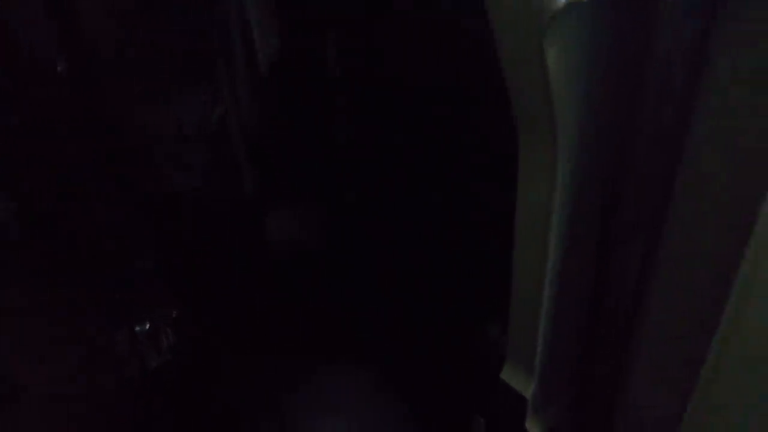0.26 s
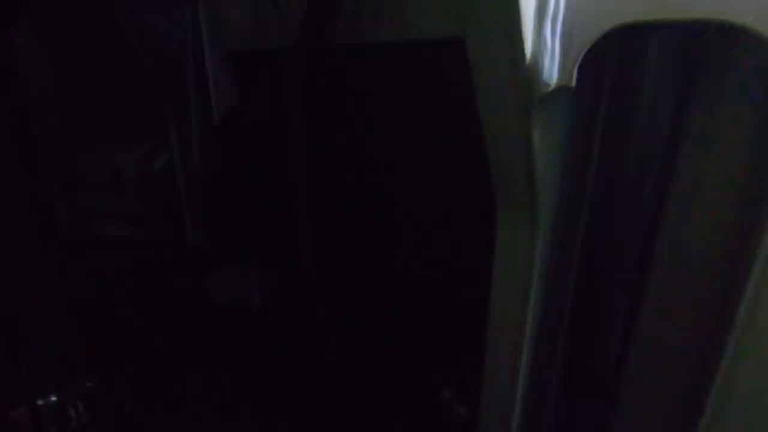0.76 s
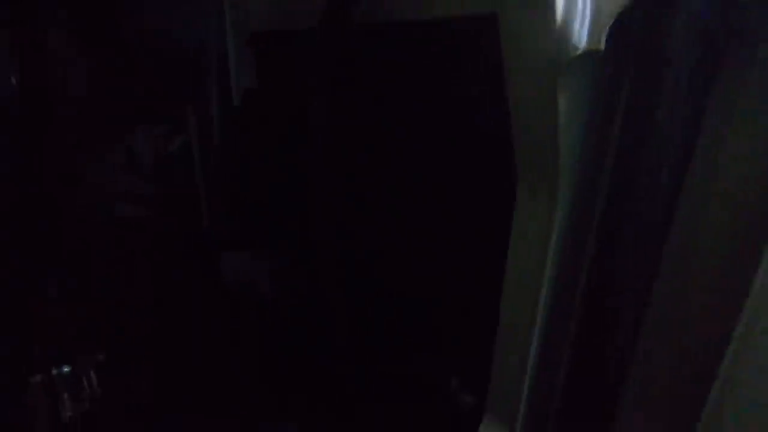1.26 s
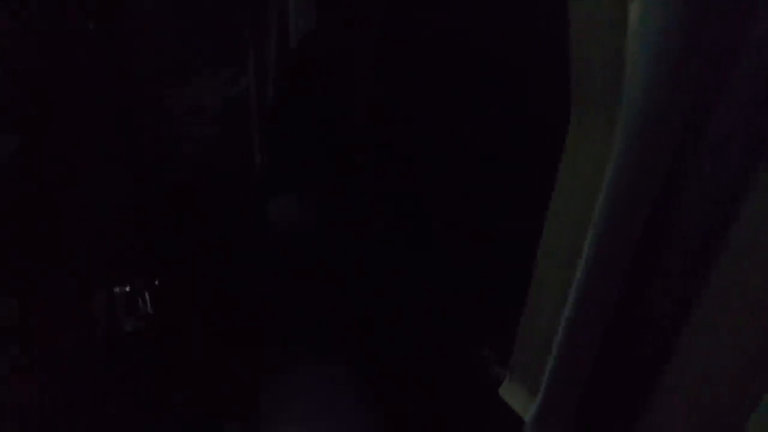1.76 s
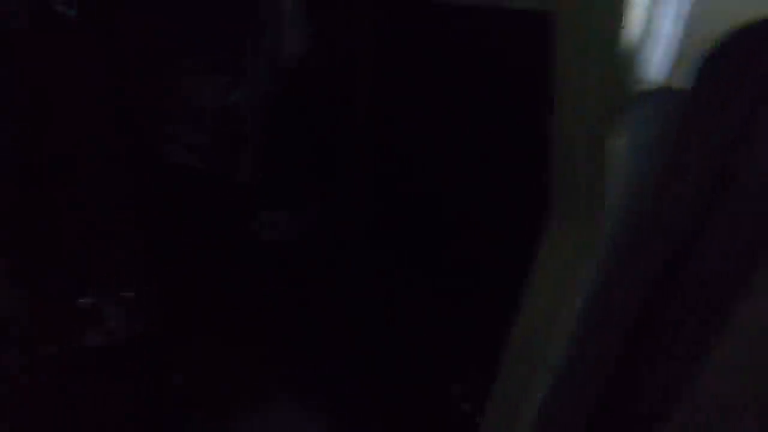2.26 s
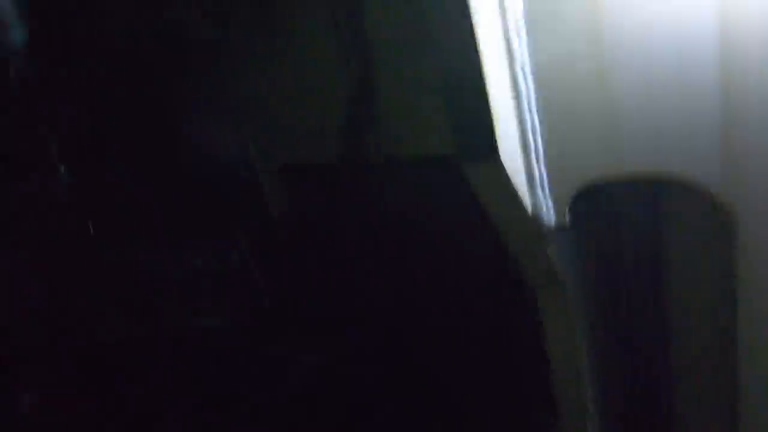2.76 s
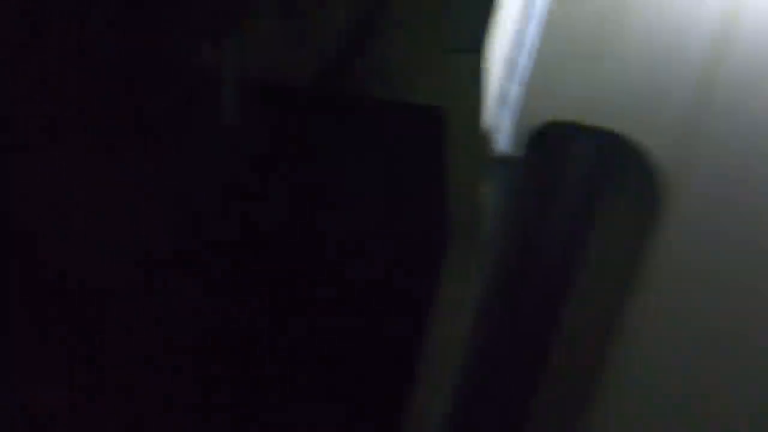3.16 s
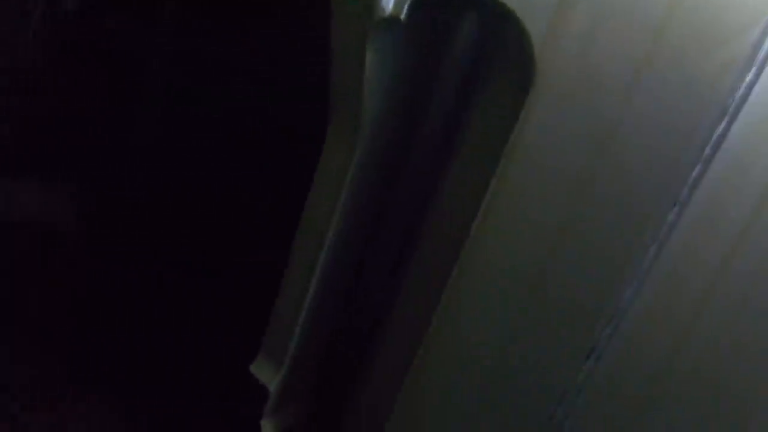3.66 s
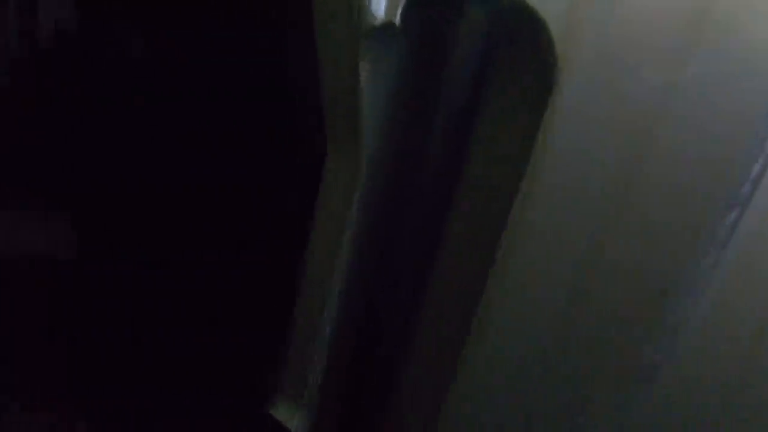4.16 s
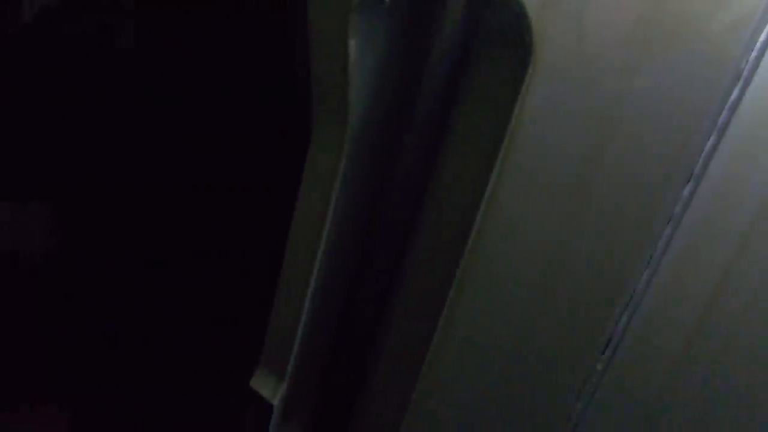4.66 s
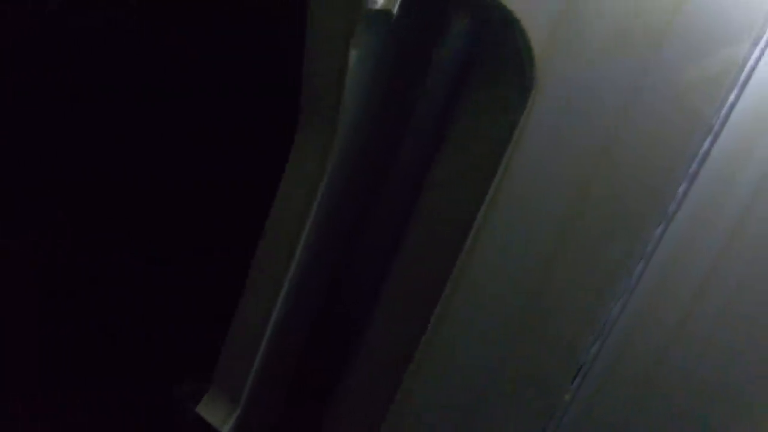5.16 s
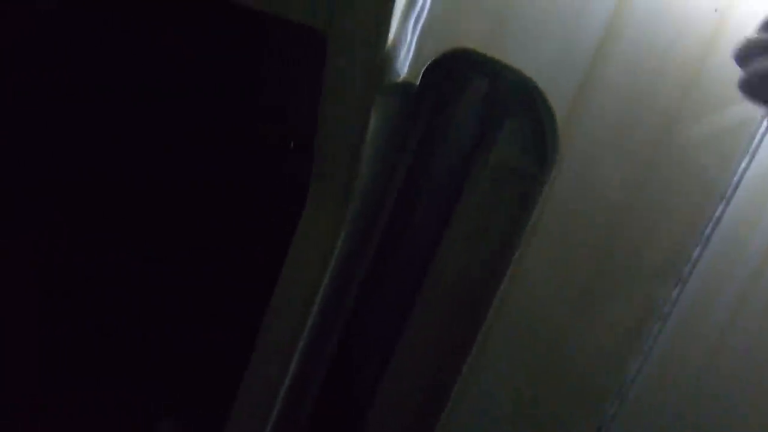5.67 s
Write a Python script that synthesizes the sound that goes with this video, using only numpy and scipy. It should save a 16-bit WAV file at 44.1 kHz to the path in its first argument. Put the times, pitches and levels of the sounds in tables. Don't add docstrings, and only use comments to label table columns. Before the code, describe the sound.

Inside a steel-walled engine room, a big diesel holds a constant deep hum near 90 hertz, dominating everything. Soft fan and pump tones and a dark airy roar lie beneath it. A thin whine swells faintly around one second, a dull knock lands at two, and the tone colour shifts slightly as the handheld microphone turns away.

```python
import sys
import numpy as np
from scipy import signal
from scipy.fft import rfft, irfft, next_fast_len
from scipy.io import wavfile
from scipy.ndimage import uniform_filter1d, minimum_filter1d

SR = 44100
rng = np.random.default_rng(int(sys.argv[2]) if len(sys.argv) > 2 else 0)


def transcribe(signal):
    frames = np.atleast_2d(signal).T
    limited = np.clip(frames, -1, 1)
    pcm = np.round(limited * 32767).astype(np.int16)
    wavfile.write(sys.argv[1], SR, pcm)


def voltage_ratio(level):
    return 10 ** (np.asarray(level, float) / 20)


N = 261071

# multiple of the four-stroke cycle [1], rms level/dB
ENGINE_ORDERS = [(6, -54.1), (8, -55.1), (9, -49.0), (12, -23.8), (13, -55.0), (14, -56.5), (15, -46.2),
                 (18, -48.8), (19, -54.8), (21, -45.3), (22, -54.1), (27, -48.9), (33, -58.8), (34, -55.6),
                 (35, -58.1), (36, -51.6), (39, -59.5), (42, -57.1), (43, -57.7), (44, -60.5), (47, -60.0),
                 (48, -58.1), (54, -59.4), (58, -63.1), (59, -65.1), (60, -63.1), (63, -64.6), (66, -61.9),
                 (70, -65.0), (72, -66.5)]
# f/Hz, rms level/dB
AUXILIARY_TONES = [(70.78, -55.1), (94.09, -53.8), (139.99, -53.7), (148.06, -54.9), (176.14, -52.9),
                   (178.51, -52.3), (316.22, -53.0), (353.34, -57.6), (478.42, -55.0), (592.9, -61.7),
                   (632.22, -61.6), (713.9, -66.4), (948.6, -68.6), (988, -70), (1170, -72), (2213, -79)]
# f/Hz, level/dB
ROAR_SPECTRUM = [(25, -7.5), (45, -6.5), (70, 3), (120, 3), (180, 5), (290, -7), (380, -3.5), (500, -12.5),
                 (700, -12.5), (1300, -20.5), (2500, -31), (4500, -40), (6000, -38), (7000, -49)]
# f/Hz, level/dB
TREBLE_LOSS = [(7000, 0), (8200, -10), (10400, -25), (10900, -30), (11500, -29), (12300, -24), (14500, -30),
               (15700, -33)]
# t/s, rms level/dB
HUM_LEVEL = [
    (0, -23.3),
    (1.3, -22.7),
    (3.2, -23.1),
    (5.92, -23.5),
]
# t/s, turn [0-1]
LISTENER_TURN = [
    (0, .1),
    (.8, 0),
    (2.0, .45),
    (3.5, 0.8),
    (4.0, 0.9),
    (5.92, 0.85),
]
# t/s, level/dB
STANDING_WAVE = [
    (0, -3),
    (.5, 3),
    (1.0, 1),
    (1.8, -4.5),
    (2.05, 4),
    (2.55, -0.5),
    (3.15, -11),
    (4.0, 1.5),
    (5.3, 1),
    (5.92, -5.5),
]
# t/s, length/s, rise level/dB
GEAR_LOADS = [
    (.25, .3, 6),
    (1.098, 0.99, 11.5),
    (3.702, .4, 6),
    (4.6, .4, 4.5),
    (5.503, 0.64, 9),
]
# t/s, peak level/dB
DECK_KNOCKS = [
    (2.006, -29.5),
    (2.531, -38),
    (4.042, -37),
]
# t/s, length/s, level/dB
FINGER_RUSTLES = [
    (2.58, .14, -96),
    (4.0, .05, -101),
    (4.2, .08, -99),
    (4.345, .004, -90.5),
]

CYCLE_HZ, CRANK_START_RAD = 7.4895, 1.513
THROB_STEADINESS = 0.65
BLOWER_HZ, BLOWER_START_RAD = 59.08, 1.1
SHADOW_POWER = 4.7
LOWER_MESH_HZ, UPPER_MESH_HZ = 1667.3, 1711.5
UPPER_ORDER_DB, WHINE_DB = -43, -69
RUMBLE_DB, RUMBLE_FOLLOWS = -39.5, 0.38


def in_time(rows):
    at_s, value = np.transpose(rows)
    return np.interp(np.arange(N) / SR, at_s, value)


def rms_one(x):
    return x / np.sqrt(np.mean(x ** 2) + 1e-20)


def colour(x, points):
    hz, level_db = np.transpose(points)
    size = next_fast_len(N + N % 2, real=True)
    grid_hz = np.maximum(np.arange(size // 2 + 1) * SR / size, 1)
    gain = voltage_ratio(np.interp(np.log(grid_hz), np.log(hz), level_db))
    return irfft(rfft(np.resize(x, size)) * gain, size)[:N]


def drift(rate_hz):
    pole = np.exp(-200 * np.pi * rate_hz / SR)
    noise = rng.standard_normal(N // 100 + 2002)
    slow = signal.lfilter([1], [1, -2 * pole, pole * pole], noise)[2000:]
    return np.interp(np.arange(N) / 100, np.arange(len(slow)), rms_one(slow - slow.mean()))


def tone(angle_rad, level_db):
    return -np.sqrt(2) * voltage_ratio(level_db) * np.cos(angle_rad)


def engine(followed_db, sway_db, throb_db):
    crank_rad = CRANK_START_RAD + 2 * np.pi * CYCLE_HZ * np.arange(N) / SR
    out = np.zeros(N)
    for order, level_db in ENGINE_ORDERS:
        order = round(order)
        in_step = order in (6, 9, 12, 15)
        offset_rad = rng.uniform(0, 2 * np.pi) * (not in_step)
        sway = sway_db * (1 - THROB_STEADINESS * in_step) * drift(0.8)
        swaying_db = level_db + throb_db * in_step + sway
        out += tone(order * crank_rad + offset_rad, followed_db.get(order, swaying_db))
    return out


def auxiliaries(blower_db, sway_db, slip):
    s = np.arange(N) / SR
    blower_rad = 2 * np.pi * BLOWER_HZ * s + BLOWER_START_RAD + 0.37 * drift(1.0)
    out = tone(blower_rad, blower_db)
    for hz, level_db in AUXILIARY_TONES:
        wander_rad = rng.uniform(0, 2 * np.pi) + slip * np.sqrt(hz) * drift(0.6)
        out += tone(2 * np.pi * hz * s + wander_rad, level_db + sway_db * drift(1.7))
    return out


def standing_waves(air, depth_db, spacing_hz, count):
    hz = np.arange(spacing_hz, 12000, spacing_hz)
    place = np.linspace(0, count - 1, N)
    out = np.zeros(N)
    for k, ripple in enumerate(rng.standard_normal((count, 1000))):
        share = np.clip(1 - np.abs(place - k), 0, 1)
        ripple_db = depth_db * np.resize(ripple, len(hz))
        out += share * colour(air, np.transpose([hz, ripple_db]))
    return out


def ventilation(rumble_db, roar_db, hiss_db, patchy_db):
    air = standing_waves(rng.standard_normal(N), depth_db=1.48, spacing_hz=15.0, count=5)
    air = colour(colour(air, TREBLE_LOSS), ROAR_SPECTRUM)
    low = signal.sosfiltfilt(signal.butter(2, 280, fs=SR, output="sos"), air)
    high = signal.sosfiltfilt(signal.butter(2, 1800, "high", fs=SR, output="sos"), air)
    middle = air - low - high
    rumble = voltage_ratio(rumble_db + patchy_db * drift(2.9)) * rms_one(low)
    roar = voltage_ratio(roar_db + patchy_db * drift(3.3)) * rms_one(middle)
    hiss = voltage_ratio(hiss_db + 2.5 + 0.13 * drift(2.1)) * rms_one(high)
    return rumble + roar + hiss


def bell(at_s, length_s):
    return np.exp(-(2 * (np.arange(N) / SR - at_s) / length_s) ** 2)


def gear_load():
    return WHINE_DB + sum(rise_db * bell(at_s, length_s) for at_s, length_s, rise_db in GEAR_LOADS)


def gears(whine_db):
    s = np.arange(N) / SR
    out = np.zeros(N)
    for mesh_hz, under_db in ((LOWER_MESH_HZ, 3.5), (UPPER_MESH_HZ, 8)):
        slip_rad = 1.6 * drift(2.5)
        level_db = np.minimum(whine_db, -61) - under_db + 2.5 * drift(3.5)
        out += tone(2 * np.pi * mesh_hz * s + slip_rad, level_db)
    return out


def knocks(plate_hz, t60_s, push_s, push_db):
    out = np.zeros(N)
    s = np.arange(SR // 2) / SR
    rise = 1 - np.exp(-(s / 0.0029) ** 2)
    push = np.sin(np.pi * np.minimum(s / push_s, 1)) ** 2
    ring = rise * voltage_ratio(-60 * s / t60_s) * np.sin(2 * np.pi * plate_hz * s)
    blow = ring + voltage_ratio(push_db) * push
    for at_s, peak_db in DECK_KNOCKS:
        out[round(at_s * SR):][:len(s)] += voltage_ratio(peak_db) * blow
    return out


def rustles():
    band = signal.butter(4, [11500, 15500], "band", fs=SR, output="sos")
    noise = signal.sosfilt(band, rng.standard_normal(N))
    return rms_one(noise) * sum(voltage_ratio(db) * bell(at_s, length_s) for at_s, length_s, db in FINGER_RUSTLES)


def scene():
    turn = np.clip(in_time(LISTENER_TURN), 0, None)
    standing_db = in_time(STANDING_WAVE)
    followed_db = {6: -57.5 + 9.5 * turn, 12: in_time(HUM_LEVEL), 21: UPPER_ORDER_DB + standing_db}
    mix = engine(followed_db, sway_db=2.5, throb_db=1.9)
    mix += auxiliaries(-42.5 - 13 * turn ** SHADOW_POWER, sway_db=3.5, slip=0.058)
    rumble_db = RUMBLE_DB + RUMBLE_FOLLOWS * standing_db
    mix += ventilation(rumble_db, roar_db=-42 - 0.35 * turn, hiss_db=-58 - 3 * turn, patchy_db=0.47)
    mix += gears(gear_load())
    mix += knocks(plate_hz=158, t60_s=0.25, push_s=0.033, push_db=-3)
    mix += rustles()
    return mix[None]


def limiter(x, knee_db, squeeze, hold_s):
    over_db = np.maximum(20 * np.log10(np.abs(x) + 1e-9) - knee_db, 0)
    hold = round(hold_s * SR)
    gain_db = uniform_filter1d(minimum_filter1d(-squeeze * over_db, hold), hold)
    return x * voltage_ratio(gain_db)


def band_limit(x):
    return signal.sosfilt(signal.butter(12, 15700, fs=SR, output="sos"), x)


def record(dry):
    held = limiter(dry, knee_db=-19.6, squeeze=0.45, hold_s=0.006)
    return band_limit(held)


dry = scene()
out = record(dry)
transcribe(out)
```